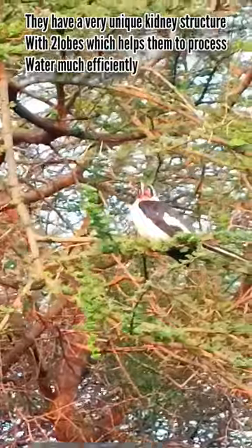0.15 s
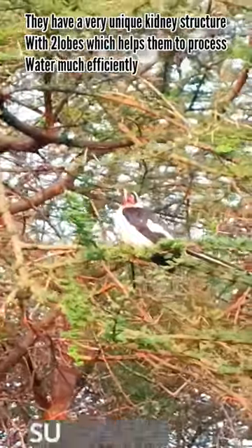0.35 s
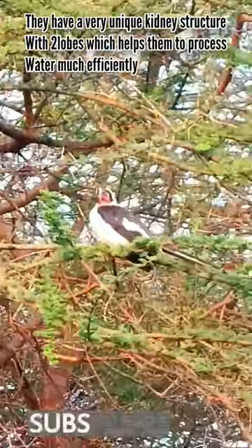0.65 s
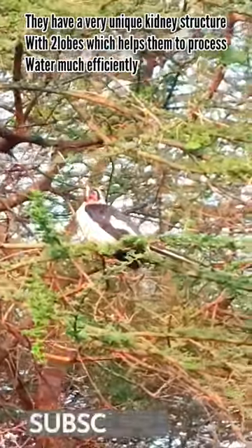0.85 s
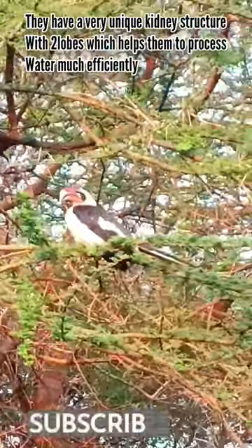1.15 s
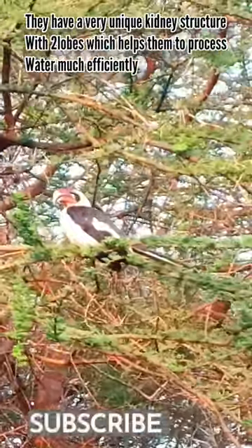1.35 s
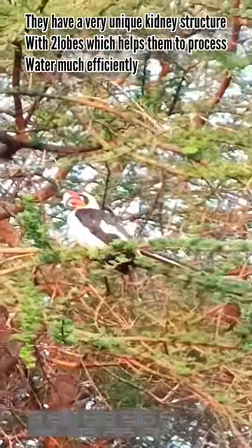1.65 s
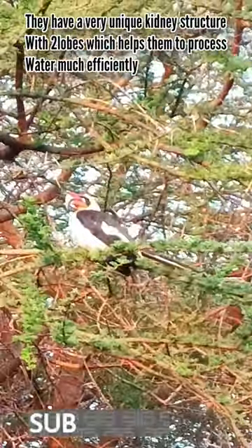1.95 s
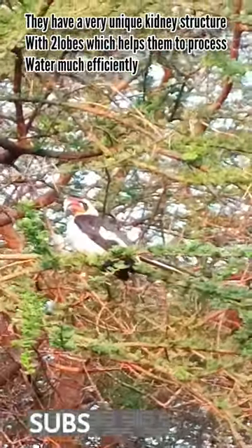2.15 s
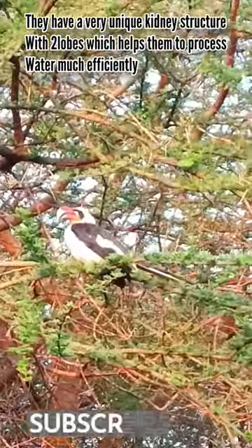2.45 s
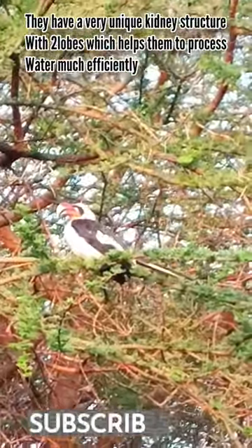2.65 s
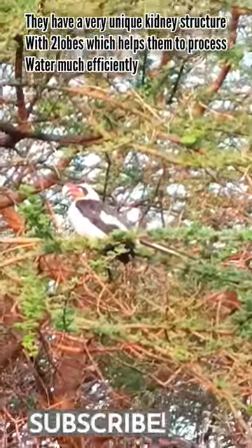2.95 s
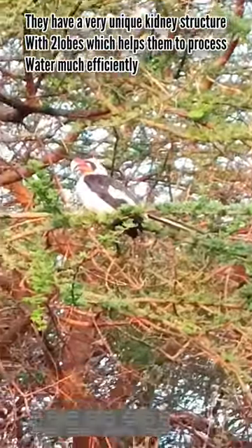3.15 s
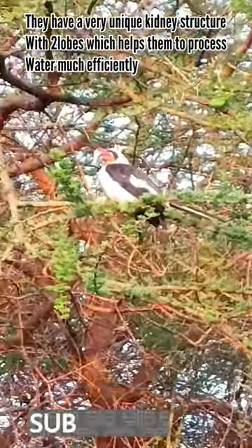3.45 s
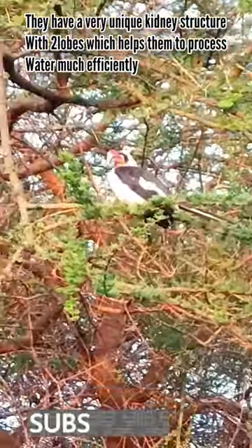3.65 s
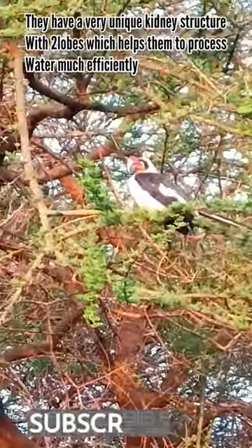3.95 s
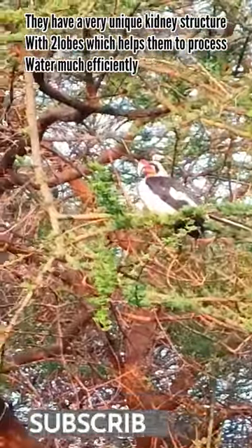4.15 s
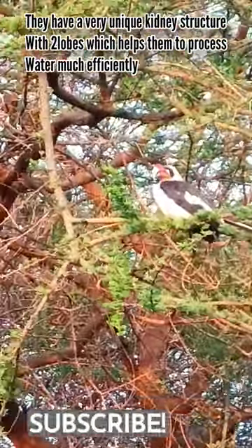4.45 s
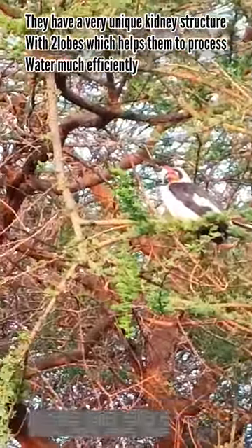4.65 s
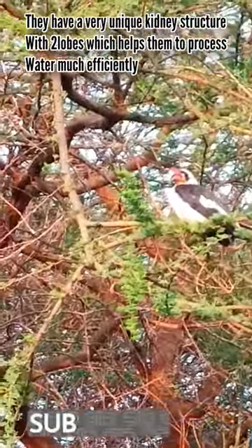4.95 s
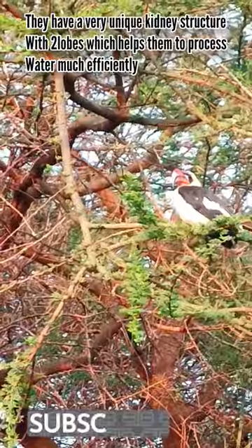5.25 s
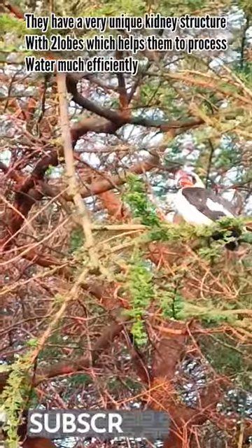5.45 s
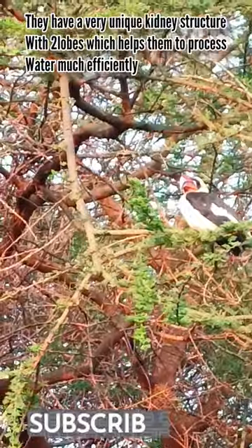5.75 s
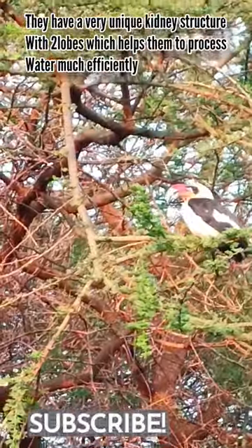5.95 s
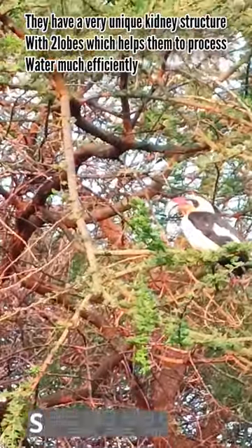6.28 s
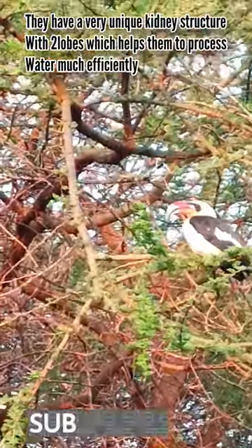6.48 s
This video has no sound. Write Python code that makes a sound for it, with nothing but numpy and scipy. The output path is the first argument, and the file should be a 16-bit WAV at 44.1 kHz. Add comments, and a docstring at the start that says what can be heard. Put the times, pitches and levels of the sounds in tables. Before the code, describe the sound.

Quick, close keyboard typing cuts off, giving way to faint small birds chirping and occasional dry ticks among trees.

```python
"""First come quick strokes on a plastic keyboard, close and central: each impact rings cap, case and spring
over a thudding desk, until the typing is cut off at 0.85 s. A thorn wood remains, with a steady dry double
tick and the whistles, warbles and trills of small birds' syrinxes. Two soft knocks fall near 2 s; then birds
rasp over a brief low rustle while a far engine changes gear, and after 5 s a dove coos. Leaves, far traffic
and a thin, high hiss last throughout, and the wood is heard through two unequal microphone ports."""
import sys
import numpy as np
from scipy import signal
from scipy.fft import rfft, irfft, next_fast_len
from scipy.io import wavfile
from scipy.ndimage import uniform_filter1d, map_coordinates

SR = 44100
rng = np.random.default_rng(int(sys.argv[2]) if len(sys.argv) > 2 else 0)


def put_to_file(sound):
    """Save the sound as 16-bit audio at rate SR, in the file named by the first command-line argument."""
    columns = np.atleast_2d(sound).T  # one column per channel
    safe = np.clip(columns, -1, 1)
    whole_steps = np.round(safe * 32767)
    wavfile.write(sys.argv[1], SR, whole_steps.astype(np.int16))


N = 291942
T = np.arange(N) / SR

# Note shape with a sharp onset and a fade: share of length, share of glide, level/dB
JAB = [(0, 0, -7), (.06, 0.046, 1), (.5, 0.53, -3), (.62, .62, -13), (1, 1, -20)]


def keyboard():
    """Impact excitation: each key contact rings the damped modes of cap, case and spring."""
    # Contacts: t/s, level/dB, ring f/Hz, ring level/dB, case level/dB, base decay time/s
    contacts = [(0.09, -14, 3250, 3.5, -3.5, 0.034), (.101, -16.5, 3800, 0.5, -17, 0.015),
                (.1184, -36.5, 4380, -2, -13, .026), (0.1253, -32, 2500, 2, -6, 0.035),
                (0.1846, -34, 4360, .5, -18, .03), (0.1934, -28, 3130, 2, -14, .018),
                (.2, -30, 4000, 0, -25, .015), (0.2035, -19, 1910, 17, -25, .04),
                (.272, -38.5, 2450, 12, -11, .03), (0.3008, -20.5, 4770, -4.5, -12.5, 0.027),
                (0.3611, -27.5, 5300, -7, -6, 0.027), (.5072, -29, 3000, 0, -10, .018),
                (.5302, -13, 3220, 6, -15, .02), (0.604, -44, 2530, 10, -11, 0.058),
                (0.6196, -41.5, 3980, 2, -5, .025), (.6744, -13.5, 3180, -0.5, -13, .014),
                (.684, -34.5, 2500, 0, -8, .025), (.693, -37, 3100, 3, -10, 0.036),
                (.789, -40, 2500, 0, -8, .03), (.7644, -39, 4630, 2, -8, 0.04),
                (0.7699, -35, 3760, 0, -5, 0.025), (.799, -14.5, 4070, 2, -10.5, 0.018)]
    # Modes of key cap, hollow case and spring: f/Hz, bandwidth/Hz, level/dB
    cap_modes = [(2130, 1250, -11), (3540, 370, -6.5), (4430, 780, -1.5), (5560, 1290, -8.5),
                 (6980, 2100, -23)]
    case_modes = [(400, 150, -9), (707, 110, -0.5), (946, 130, 7), (1300, 700, -2.5)]
    spring_modes = [(8430, 1100, 5), (9760, 190, 16.5), (11640, 1500, -0.5), (14700, 1600, -34)]
    # Springs let go: t/s, peak level/dB
    pings = [(.155, -24), (.2026, -34.5), (0.233, -35)]
    travel_s, plastic_band = .002, (3600, 6000, 0)  # touch to hard stop; the broad band the plastic passes
    hard_stop = np.eye(1, SR // 8, round(travel_s * SR))[0]
    out = np.zeros(N)
    for s, db, ring_hz, ring_db, case_db, decay_s in contacts:
        cap = cap_modes + [(ring_hz, 280, ring_db)]
        blow = unit_peak(filtered(hard_stop, resonator(cap)))
        hit = .77 * burst(.8 * decay_s, .0015, cap) + amp(-4) * blow
        hit = unit_peak(filtered(hit, resonator([plastic_band])))
        # Each key sits elsewhere on the case and weights its modes differently.
        case = [(hz, width, level + rng.normal(0, 2.5)) for hz, width, level in case_modes]
        hit += amp(case_db) * burst(1.92 * decay_s, .0016, case)
        hit += amp(-21) * burst(.38 * decay_s, .0012, spring_modes)
        hit += amp(-24) * burst(.13, .0029, cap_modes + case_modes)  # room reverberation
        out[round(s * SR):][:len(hit)] += amp(db) * hit
    for s, db in pings:
        out[round(s * SR):][:SR // 8] += amp(db) * burst(.011, .0003, spring_modes)
    return out


def desk():
    """Forced vibration: the desk carries a low thud and a rustle of fingers, both broadband noise."""
    # Envelopes: t/s, thud level/dB, rustle level/dB
    levels = [(0, -37.5, -50.5), (.138, -38.5, -58), (.228, -46, -62), (.28, -42, -65), (.326, -45.5, -64),
              (.424, -42.5, -73), (.554, -36, -60), (.6, -43.5, -64), (.676, -38, -63), (.786, -42.5, -63),
              (.82, -36, -65)]
    # Spectra of thud and rustle: f/Hz, spectral density/dB
    thud = [(12, -19), (20, -7.5), (59, 4), (74, -6.5), (91, -19.5), (128, -6.5), (150, -14.5), (300, -29),
            (390, -48.5), (660, -120)]
    rustle = [(180, -37.5), (300, 0), (519, -11.5), (1010, -4.5), (2030, -10), (2480, -10.5), (2880, -8),
              (4830, -12.5), (7500, -26), (16000, -36)]
    thud_db, rustle_db = curves(levels)
    out = np.zeros(N)
    for spectrum, level_db in ((thud, thud_db), (rustle, rustle_db + 6.55 * wobble(30))):
        noise = filtered(rng.standard_normal(N), lambda hz: amp(along(spectrum, hz)))
        out += amp(level_db) * unit_rms(noise)
    return out


def ticks():
    """Impulse response: a bird's steady double tick recurs every 1.49 s, and lone dry ticks fall between; each
    is a sharp blow and a brief rustle in the same modes."""
    # Lone ticks: t/s, level/dB, relative treble level/dB, left-right/dB
    strays = [(.9113, -44, -28, -4), (1.1055, -36, 2.5, 3), (1.1216, -45, -20, .5), (1.5299, -39, -27, 4),
              (1.5474, -40, -24, 9), (2.3526, -56, -28, 7.5), (2.4187, -52, -27, 12),
              (2.4594, -44, -27, 3.5)]
    # Modes of a snap and of its treble: f/Hz, bandwidth/Hz, level/dB
    snap_modes = [(2970, 570, -5), (4150, 1400, -5.5), (5800, 430, 7.5), (6800, 1640, -10.5),
                  (1300, 1700, -18)]
    fizz_modes = [(8800, 2300, -8.5), (11500, 3000, -13.5), (15200, 1300, 3.5)]
    first_s, period_s, gap_s = .3472, 1.4934, .017
    pairs = [(first_s + k * period_s + delay_s, db, -20, pan_db)
             for k in range(5) for delay_s, db, pan_db in ((0, -27, -6.5), (gap_s, -32, 10))]
    crack = unit_peak(filtered(np.eye(1, SR // 8)[0], resonator(snap_modes)))
    out = np.zeros((2, N + SR))
    for s, db, treble_db, pan_db in pairs + list(strays):
        rustle = amp(-11) * burst(.012, .0005, snap_modes) + amp(-17) * burst(.08, .002, snap_modes)
        fizz = burst(.008, .00022, fizz_modes) + amp(-10) * burst(.16, .0019, fizz_modes)
        snap = crack + rustle + amp(treble_db) * fizz
        out[:, round(s * SR):][:, :len(snap)] += amp(db) * np.outer(sides(pan_db), snap)
    return out[:, :N]


def knocks():
    """Heavy damping: two soft knocks die quickly in broad, low resonances."""
    # Knocks: t/s, level before the band-pass/dB
    blows = [(1.978, -46), (2.2646, -36.5)]
    out = np.zeros((2, N))
    for s, db in blows:
        contact = burst(.015, .00067, [(400, 520, -2), (1126, 570, -8)])
        knock = filtered(contact, resonator([(400, 700, 0)]))
        out[:, round(s * SR):][:, :len(knock)] += amp(db) * np.outer(sides(pan_db=11), knock)
    return out


def syrinx(notes, wander_hz, flutter_db, pulse_hz=50, drop_hz=0, depth=0, octave_db=-45, third_db=-60):
    """Self-sustained oscillation: a gliding harmonic tone that can swell and slide once a pulse."""
    out = np.zeros((2, N))
    for note in notes:
        a, b = span(note)
        pitch_hz, level_db, pan_db = curves(note, T[a:b])
        beat = (pulse_hz * (T[a:b] - T[a]) + .06 * wobble(20, b - a)) % 1
        pitch_hz = pitch_hz + drop_hz * (.5 - beat) + wander_hz * wobble(300.4, b - a)
        swell = unit_rms(1 - depth * np.cos(np.pi * beat) ** 2)
        phase = 2 * np.pi * np.cumsum(pitch_hz) / SR
        third = amp(third_db) * (pitch_hz < 2500) * np.sin(3 * phase)
        tone = np.sqrt(2) * (np.sin(phase) + amp(octave_db) * np.sin(2 * phase) + third)
        flutter = np.array([wobble(120, b - a), wobble(120.7, b - a)])  # leaves scatter each path
        out[:, a:b] += tone * swell * edges(a, b) * sides(pan_db) * amp(level_db + flutter_db * flutter)
    return out


def whistles():
    """Nearly sinusoidal oscillation: thin falling whistles, level peeps, short chips and one high arch."""
    # Calls: t/s, length/s, start f/Hz, end f/Hz, level/dB, left-right/dB
    seeps = [(.89, 0.19, 7030, 6550, -50, -0.5), (1.73, 0.21, 7080, 6480, -52, -0.5),
             (2.75, 0.18, 6840, 6210, -53.5, 4), (3.695, .17, 7380, 6110, -39.5, -1.5)]
    peeps = [(4.668, .11, 5570, 5640, -45, -13), (5.465, 0.15, 5620, 5720, -56, -11),
             (4.2, 0.54, 6200, 5500, -61, -10), (3.93, 0.32, 4650, 4600, -61, 11)]
    chips = [(.012, 0.074, 2660, 2140, -55, 8), (6.472, 0.0257, 5300, 4490, -51.5, 9),
             (2.33, .12, 4900, 4820, -68.5, 2), (3.03, .03, 4770, 4840, -56, 7),
             (6.283, .024, 5100, 4700, -57, 7), (6.272, .012, 4450, 4650, -62, 7),
             (6.304, 0.024, 7300, 7900, -62, 4), (6.33, .04, 7800, 8150, -69, 4),
             (6.377, 0.083, 7720, 7700, -58, 3), (6.345, .02, 7100, 7150, -57, 3),
             (6.385, .017, 6100, 6000, -63, 3), (6.418, .04, 6000, 6400, -64, 3),
             (4.978, .022, 2480, 2800, -51, 8), (5.085, .16, 2790, 2760, -64, 8),
             (4.87, .1, 2790, 2760, -61, 6), (5.108, .03, 3720, 3690, -57, 6),
             (5.14, .06, 3690, 3660, -64, 6), (5.05, .014, 2350, 2150, -57, 7),
             (4.925, .022, 2300, 2020, -55, 9), (4.775, .015, 2150, 1950, -59, 9),
             (1.198, 0.038, 5990, 5900, -63, -16), (1.68, 0.021, 4860, 4800, -55.5, 4),
             (2.056, 0.066, 5930, 5970, -61, -2), (3.049, 0.012, 2170, 2080, -61, 13),
             (4.686, 0.014, 2800, 3300, -53, 4), (4.708, .016, 3000, 3400, -55, 4),
             (4.685, 0.043, 2346, 2487, -63, 6), (4.71, 0.023, 1500, 1775, -55, 15),
             (4.748, 0.018, 2900, 1946, -63, 9), (4.786, 0.017, 1430, 1520, -55, 16),
             (4.797, .015, 2180, 2250, -51, 12), (4.842, 0.021, 2600, 1980, -49.5, 10),
             (4.868, 0.022, 2450, 1980, -54, 6), (4.895, 0.025, 2550, 2150, -56.5, 11),
             (4.989, 0.023, 1500, 1710, -63, 11), (5.022, 0.016, 2450, 2100, -55, 5),
             (5.068, 0.016, 2457, 2080, -51, 7), (5.092, 0.016, 2350, 2030, -53, 6),
             (5.328, 0.019, 1360, 1600, -61, 17), (5.315, 0.024, 2550, 2150, -51, 8),
             (5.348, 0.024, 2480, 2422, -49, 8), (5.372, .016, 2200, 1950, -55, 8),
             (5.393, 0.018, 2100, 1876, -52, 8), (5.356, .025, 3400, 3600, -58, 5),
             (5.381, 0.016, 3600, 2900, -58, 5), (5.201, 0.11, 6515, 5280, -65, -11),
             (5.308, 0.061, 6080, 5480, -61, -8), (5.369, 0.042, 5900, 5530, -60, -11),
             (5.5, 0.095, 5780, 6110, -65.5, -5), (5.951, 0.068, 4350, 4594, -64, 8.5),
             (6.447, 0.045, 7450, 6700, -58, 9)]
    # Note shapes: share of length, share of glide, level/dB
    fall = [(0, .9, -27), (.12, .25, -16), (.18, 0, -8.5), (.3, .12, -3), (.7, .7, -2.5),
            (0.999, 0.94, -15)]
    slide = [(0, 0, 0), (1, 1, 0)]
    # Arched whistle: t/s, f/Hz, level/dB, left-right/dB
    arc = [(6.303, 6150, -55, 2), (6.322, 6650, -50, 2), (6.35, 6850, -52, 2), (6.372, 7150, -55, 2),
           (6.41, 6850, -52, 2), (6.445, 6950, -51, 2), (6.493, 6400, -55, 2)]
    return (syrinx(shaped(seeps, fall) + [arc], wander_hz=60, flutter_db=4)
            + syrinx(shaped(peeps, JAB), wander_hz=65, flutter_db=2.5)
            + syrinx(shaped(chips, slide), wander_hz=45, flutter_db=3.5))


def rasps_and_rustle():
    """Random modulation widens a tone into noise: birds' rasps, and a brief low rustle near 3.1 s."""
    # Noise bands (the one at 570 Hz is the rustle):
    # t/s, length/s, start f/Hz, end f/Hz, bandwidth/Hz, level/dB, left-right/dB
    bands = [(0.859, 0.13, 3950, 3860, 653, -60, 10), (2.753, .17, 7150, 6560, 1456, -57, 6),
             (2.9, 0.12, 6050, 5770, 953, -50.5, -0.5), (3.048, 0.12, 5800, 5520, 2200, -46.5, 1),
             (3.159, 0.13, 6200, 6010, 2000, -52.5, 1), (3.24, 0.23, 5500, 5060, 2910, -51.5, 1),
             (3.429, .16, 5150, 5030, 2796, -50, -3.5), (3.059, .2, 570, 590, 700, -60.5, 13),
             (3.441, 0.18, 3046, 2210, 2200, -56, 6), (3.597, 0.12, 4300, 5100, 1400, -48.5, 10),
             (3.7, .13, 5000, 6300, 898, -44, 0), (3.771, 0.13, 6000, 5900, 703, -44, 0),
             (3.82, .24, 6280, 5910, 499, -55.5, -2), (3.591, 0.31, 3950, 4110, 803, -53, 6),
             (3.87, 0.39, 4200, 4320, 1252, -59, 6), (4.22, 0.083, 6200, 6220, 1507, -56.5, 0),
             (4.272, .19, 6250, 6240, 1690, -49, -1.5), (4.417, .2, 6300, 6030, 1500, -49.5, -1),
             (4.559, 0.28, 6050, 5800, 1310, -56, 2), (4.78, 0.21, 5800, 5726, 1496, -53.5, -3),
             (4.951, .2, 5500, 5510, 1201, -56, -6), (4.681, 0.44, 2504, 2406, 1298, -59, 3),
             (5.223, .24, 2353, 2277, 1102, -57.5, 9), (6.471, 0.067, 5100, 4900, 750, -62, 8),
             (6.33, .1, 7000, 7100, 1800, -58, 3), (6.44, .09, 7100, 6800, 1600, -58, 5)]
    # Shape of each: share of length, share of glide, level/dB
    gust = [(-.2, 0, -25), (0, 0.0025, -7.5), (.35, .35, 1), (.75, .75, -1.5), (1, 1, -7), (1.3, 1, -20)]
    out = np.zeros((2, N))
    for s, length, hz, to_hz, width_hz, db, pan_db in bands:
        contour = shaped([(s, length, hz, to_hz, db, pan_db)], gust)[0]
        a, b = span(contour)
        centre_hz, level_db, _ = curves(contour, T[a:b])
        centre_hz = centre_hz + .07 * width_hz * wobble(30, b - a)
        phase = 2 * np.pi * np.cumsum(centre_hz) / SR
        knots = (T[a:b] - T[a]) * width_hz  # size and sign change as fast as the band is wide
        chance = np.array([map_coordinates(row, [knots]) for row in rng.standard_normal((4, 2000))])
        noise = chance[:2] * np.sin(phase) + chance[2:] * np.cos(phase)
        envelope = edges(a, b) * amp(level_db + 2.2 * wobble(25.5, b - a))
        out[:, a:b] += noise * envelope * sides(pan_db)[:, None]
    return out


def churrs():
    """Amplitude and frequency modulation: each pulse slides upward, and a thin upper voice joins."""
    # Churrs: t/s, length/s, level/dB, left-right/dB
    calls = [(4.702, 0.28, -46, 6), (4.998, 0.14, -45.5, 8)]
    start_hz, end_hz, upper_hz = 2830, 2750, 3666
    lower = shaped([(s, length, start_hz, end_hz, db, pan) for s, length, db, pan in calls], JAB)
    upper = shaped([(s + .012, length, upper_hz, upper_hz, db - 9.5, pan)
                    for s, length, db, pan in calls], JAB)
    return (syrinx(upper, wander_hz=40, flutter_db=5.5)
            + syrinx(lower, wander_hz=80, flutter_db=3, pulse_hz=46, drop_hz=-280, depth=.8))


def slurs():
    """Harmonic timbre: strong second and third partials make these gliding notes nasal."""
    # One contour a note: t/s, f/Hz, level/dB, left-right/dB
    notes = [
        [(3.355, 767, -71, 8), (3.4, 816, -62, 9), (3.445, 864, -62.5, 7)],
        [(3.453, 2050, -53, 13), (3.462, 1720, -48.5, 9), (3.485, 1400, -58, 8), (3.52, 1340, -63, 8),
         (3.536, 1600, -54, 8), (3.549, 3570, -54, 3)],
        [(3.482, 1680, -56, 8), (3.512, 1400, -59, 8)],
        [(3.55, 1500, -59, 10), (3.565, 1330, -59, 10), (3.585, 830, -58, 10)],
        [(3.578, 1500, -61, 8), (3.592, 1020, -57, 9), (3.608, 830, -59, 11)],
    ]
    return (syrinx(notes[:1], wander_hz=25, flutter_db=2.5, octave_db=4, third_db=-3)
            + syrinx(notes[1:], wander_hz=60, flutter_db=2, octave_db=-7, third_db=-12))


def dove():
    """Low, nearly pure oscillation: five coos, each swelling and fading on one pitch."""
    # Coos: t/s, length/s, f/Hz, level/dB
    coos = [(5.331, 0.096, 481, -59), (5.559, 0.062, 508, -57), (5.694, .05, 544.4, -49.5),
            (5.76, 0.062, 532, -55), (5.97, 0.072, 500, -59.5)]
    # Note shape: share of length, share of glide, level/dB
    swell = [(0, 0, -12), (.12, .1, -5.5), (.55, .55, -3.5), (1, 1, -12)]
    pan_db = 8.5
    notes = shaped([(s, length, hz, hz, db, pan_db) for s, length, hz, db in coos], swell)
    return syrinx(notes, wander_hz=26, flutter_db=4)


def warbles():
    """Modulation of a gliding carrier: falling pulses, fast or slow, ride on an arch of pitch."""
    # Fast and slow warbles: t/s, length/s, top f/Hz, level/dB, left-right/dB
    fast = [(1.165, .165, 2600, -55, 12), (1.608, 0.158, 2580, -56.5, 12), (5.24, 0.15, 2540, -54.5, 12)]
    slow = [(3.688, .15, 2740, -61, 11), (4.078, .155, 2730, -61, 9)]
    # Note shape: share of length, share of glide, level/dB
    arch = [(0, .8, -4), (.08, .62, 0), (.27, 0, -1), (.62, .1, -1), (.82, .62, 0.5), (.95, .95, -1),
            (1, 0.98, -12)]
    out = np.zeros((2, N))
    for calls, end_ratio, pulse_hz, drop_hz, depth in ((fast, .78, 43, 260, .8), (slow, .85, 24, 330, .55)):
        notes = shaped([(s, length, hz, end_ratio * hz, db, pan) for s, length, hz, db, pan in calls], arch)
        out += syrinx(notes, wander_hz=70, flutter_db=2.5, pulse_hz=pulse_hz, drop_hz=drop_hz, depth=depth)
    return out


def trills():
    """Modulation of a steady carrier: rapid falling pulses spread one high pitch into sidebands."""
    # Trills: t/s, length/s, level/dB, left-right/dB
    calls = [(0.21, 0.09, -58, 0), (1.128, 0.32, -58.5, 7), (1.87, 0.22, -56, 6), (2.31, 0.23, -63, 9.5),
             (2.569, 0.26, -57, 8), (4.541, 0.25, -55, 6), (5.16, 0.18, -62.5, 12),
             (5.651, 0.23, -57.5, 6.5), (5.87, 0.25, -65, 10), (6.45, 0.26, -65.5, 3)]
    # Note shape: share of length, share of glide, level/dB
    linger = [(0, 0, -8), (.15, 0, -3), (.5, 0, 1), (.8, 0, -5.5), (1, 0, -15.5), (1.5, 0, -19)]
    carrier_hz = 4010
    notes = shaped([(s, length, carrier_hz, carrier_hz, db, pan) for s, length, db, pan in calls], linger)
    return syrinx(notes, wander_hz=150, flutter_db=4, pulse_hz=56, drop_hz=420, depth=.55)


def chorus(count=110):
    """Incoherent superposition: many far birds give faint slides of chance pitch, length and place."""
    notes = []
    for when, pitch, length, slide, loud, place in rng.random((count, 6)):
        s, hz, db = when * (T[-1] - .2), 1200 * 5.5 ** pitch, -74 + 7 * loud
        end_s, end_hz = s + .02 + .07 * length ** 2, hz * (.85 + .25 * slide)
        notes.append([(s, hz, db, 8 * place), (end_s, end_hz, db, 8 * place)])
    return syrinx(notes, wander_hz=120, flutter_db=4)


def echoes(direct, near_t60_s=.12, far_t60_s=.5):
    """Scattering: near branches return the sound briefly, far trunks for longer, differently to each port."""
    t = np.arange(SR // 2) / SR
    near, far = unit_rms(amp(-60 * t / near_t60_s)), unit_rms(amp(-60 * t / far_t60_s))
    tail = rng.standard_normal((2, len(t))) * np.hypot(amp(-7) * near, amp(-11) * far) / np.sqrt(len(t))
    return signal.fftconvolve(direct, tail, axes=1)[:, :N]


def engine():
    """Harmonics of the firing rate: a far engine revs, changes gear and revs again, unsteady in the air."""
    # Engine run: t/s, firing f/Hz, second-order level/dB, third-order level/dB
    run = [(.9, 42.87, -60, -62.5), (1.6, 45.07, -57.5, -73), (2.03, 45.26, -55.5, -76),
           (2.55, 43.67, -61, -66.5), (2.95, 38.55, -61, -51), (3.06, 37.04, -75, -55.5),
           (3.2, 29.58, -66, -68), (3.71, 30.94, -69, -63.5), (3.95, 37.06, -58.5, -57),
           (4.09, 38.9, -63.5, -43.5), (4.24, 41.6, -58, -56.5), (4.55, 42.03, -55.5, -60),
           (4.8, 41.67, -59, -53.5), (5.2, 42.83, -55, -60), (5.52, 41.1, -56.5, -55.5),
           (5.82, 40.1, -54.5, -55.5), (6.0, 39.83, -60, -52.5), (6.28, 37.88, -57.5, -50),
           (6.55, 37.25, -58, -61.5)]
    # Growing unevenness of the hum: t/s, depth/dB
    flutter = [(4.2, 1.3), (4.8, 4.5)]
    firing_hz, second_db, third_db = curves(run)
    flutter_db = curves(flutter)[0]
    phase = 2 * np.pi * np.cumsum(firing_hz + .4 * wobble(22.96)) / SR
    orders_db = [second_db - 15, second_db, third_db, third_db - 14, second_db - 15]
    hum = sum(amp(db + flutter_db * wobble(16)) * np.sin(k * phase) for k, db in enumerate(orders_db, 1))
    return np.outer(sides(pan_db=10.8), np.sqrt(2) * hum)


def wood():
    """Broadband noise: a low hush of far traffic and air, leaf rustle, and a separate thin, high hiss."""
    # Spectrum of the hush: f/Hz, spectral density/dB
    hush_spectrum = [(15, -42), (25, -33), (38, -21), (69, -8), (98, -3.5), (115, -9), (161, -8.5),
                     (264, -10), (425, -16), (1080, -21), (1530, -18.5), (2040, -21), (3500, -39.5),
                     (4550, -77), (7700, -120)]
    # Leaf rustle up to 8 kHz, and the hiss near 15 kHz: f/Hz, spectral density/dB
    treble_spectrum = [(1470, -25), (2500, -1.5), (3280, -2), (4020, 1.5), (4580, 0.5), (6110, -1),
                       (7400, -10), (8000, -23), (9810, -33), (13500, -26), (14000, -22.5), (14900, -7),
                       (16000, -17.5)]
    # Envelope of rustle and hiss: t/s, level/dB
    treble_levels = [(.86, -60), (1.9, -58.5), (2.2, -59.5), (3.25, -61), (3.51, -54), (3.76, -60.5),
                     (4.45, -62.5), (4.85, -55), (5.4, -59.5), (6.06, -63.5), (6.5, -62)]
    hush, treble = diffuse_noise(hush_spectrum), diffuse_noise(treble_spectrum)
    hush_db = -56.5 + .1845 * T + .73 * wobble(2.96)
    return amp(hush_db) * hush + amp(curves(treble_levels)[0]) * treble


def diffuse_noise(spectrum, patchy_db=1.8):
    """Partial coherence: noise with patches of random gain, as alike and balanced as the ports make it."""
    # Imbalance of the ports: f/Hz, left-right/dB
    balance = [(60, 3.5), (110, 5), (200, 11), (380, 9), (700, 10), (1290, 12.5), (2380, 9), (4400, 2.5),
               (8120, 2), (15000, -2.5)]
    # Likeness of the ports: f/Hz, correlation
    coherence = [(60, 0.72), (120, 0.96), (250, 0.74), (500, 0.17), (1000, 0.19), (3000, 0.067),
                 (15000, .1)]

    def mid_and_side(hz):
        angle = np.arccos(np.clip(along(coherence, hz), 0, 1)) / 2
        return amp(along(spectrum, hz)) * [np.cos(angle), np.sin(angle)]

    cells = signal.stft(rng.standard_normal((2, N)), nperseg=512)[2]
    patches = uniform_filter1d(uniform_filter1d(rng.standard_normal(cells.shape[1:]), 6, 0), 14, 1)
    noise = signal.istft(cells * amp(patchy_db * unit_rms(patches)), nperseg=512)[1][:, :N]
    mid, side = filtered(noise, mid_and_side)
    return unit_rms(filtered(np.array([mid + side, mid - side]), lambda hz: sides(along(balance, hz))))


def burst(t60_s, rise_s, modes):
    """Exponential decay: a puff of grainy contact noise rings the modes; peak 1."""
    t = np.arange(SR // 8) / SR
    grains = rng.standard_normal(len(t)) * amp(3.1 * wobble(1168, len(t)))
    envelope = amp(-60 * t / t60_s) * (1 - np.exp(-t / rise_s)) ** 2
    return unit_peak(filtered(grains * envelope, resonator(modes)))


def resonator(modes):
    """Modal superposition: causal response of (f/Hz, bandwidth/Hz, level/dB) modes of alternating sign."""
    return lambda f: sum((-1) ** k * amp(db) * 1j * f * width / (hz * hz - f * f + 1j * f * width)
                         for k, (hz, width, db) in enumerate(modes))


def filtered(x, response):
    """Linear filtering: the spectrum of x times a complex frequency response."""
    n = x.shape[-1]
    padded = next_fast_len(n + 8192)
    return irfft(rfft(x, padded) * response(np.fft.rfftfreq(padded, 1 / SR)), padded)[..., :n]


def shaped(rows, shape):
    """Rows drawn out to one shape, as contours of t/s, f/Hz, level/dB, left-right/dB."""
    return [[(s + at * length, hz + glide * (to_hz - hz), db + step_db, pan) for at, glide, step_db in shape]
            for s, length, hz, to_hz, db, pan in rows]


def span(contour):
    """Start and end samples of a contour."""
    return round(contour[0][0] * SR), min(round(contour[-1][0] * SR), N)


def edges(a, b):
    """Onset and release ramps of 2 ms."""
    return np.clip(np.minimum(T[a:b] - T[a], T[b - 1] - T[a:b]) / .002, 0, 1)


def sides(pan_db):
    """Left and right gains of a level difference."""
    return 2 * np.array([amp(pan_db), amp(0 * pan_db)]) / (1 + amp(pan_db))


def wobble(rate, n=N):
    """A smooth random curve, rate knots a second."""
    return map_coordinates(rng.standard_normal(int(n * rate / SR) + 4), [np.arange(n) * rate / SR])


def curves(rows, t=T):
    """Interpolation in time of each column after the first."""
    times, *columns = np.transpose(rows)
    return [np.interp(t, times, column) for column in columns]


def along(points, hz):
    """Interpolation of (f/Hz, value) points on a logarithmic frequency axis."""
    f, values = np.transpose(points)
    return np.interp(np.log(hz + 1), np.log(f + 1), values)


def amp(db):
    """Amplitude ratio of a level in dB."""
    return 10 ** (np.asarray(db) / 20)


def unit_rms(x):
    """Scaled to rms 1."""
    return x / np.sqrt(np.mean(np.abs(x) ** 2) + 1e-20)


def unit_peak(x):
    """Scaled to peak 1."""
    return x / np.abs(x).max()


def scene():
    """Arrival-time difference: the wood reaches the left port late; the typing is the same on both sides."""
    left_lag_s, cut_s = 34 / SR, .848
    direct = whistles() + churrs() + slurs() + dove() + warbles() + trills() + rasps_and_rustle() + chorus()
    left, right = direct + echoes(direct) + ticks() + knocks() + engine() + wood()
    left = filtered(left, lambda hz: np.exp(-2j * np.pi * hz * left_lag_s))
    typing = (keyboard() + desk()) * np.clip((cut_s - T) / .003, 0, 1)
    return np.array([left, right]) + typing


def record(dry):
    """Band limiting: an ideal low-pass filter at 15.9 kHz."""
    return filtered(dry, lambda hz: hz < 15900)


dry = scene()
out = record(dry)
put_to_file(out)
```